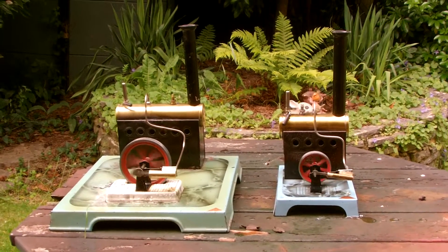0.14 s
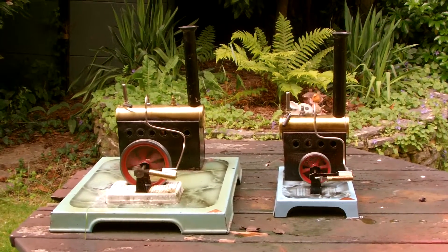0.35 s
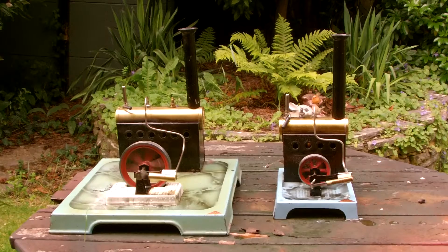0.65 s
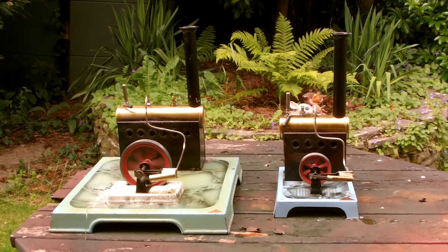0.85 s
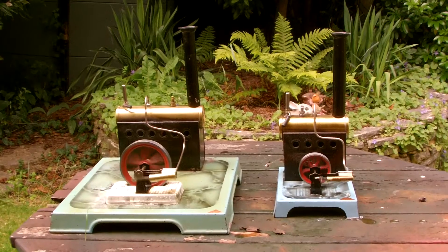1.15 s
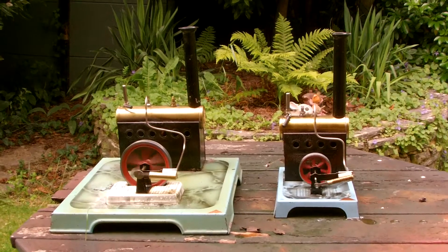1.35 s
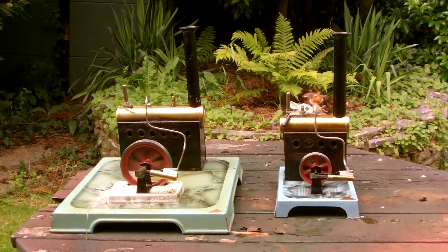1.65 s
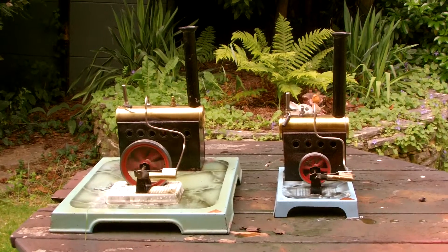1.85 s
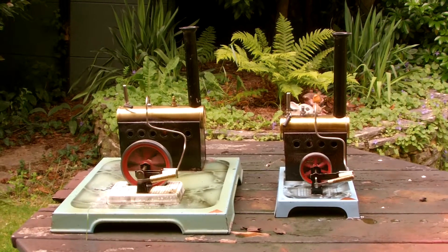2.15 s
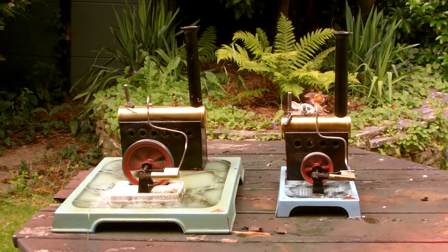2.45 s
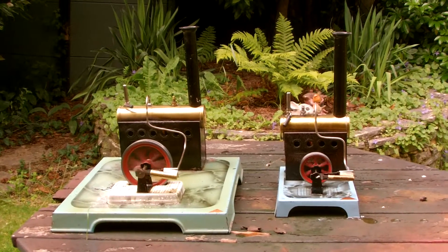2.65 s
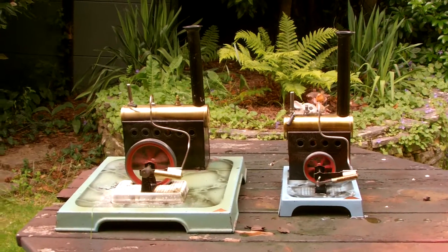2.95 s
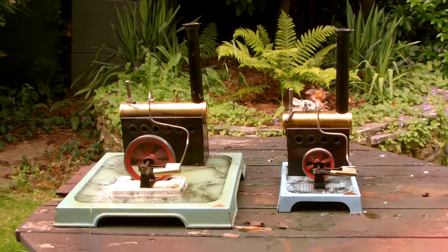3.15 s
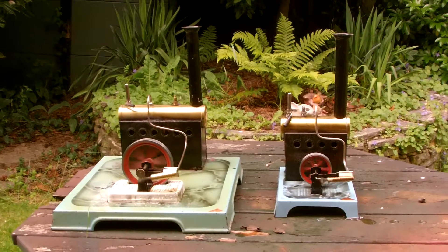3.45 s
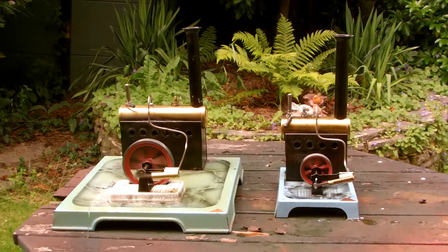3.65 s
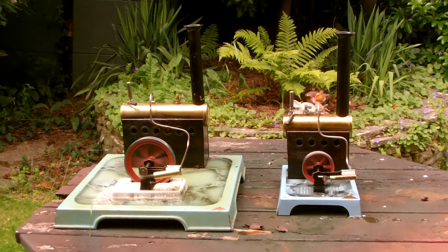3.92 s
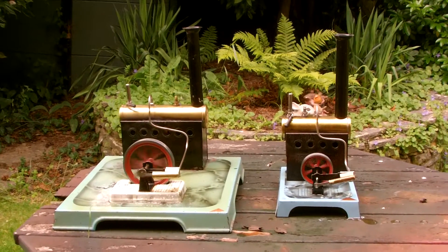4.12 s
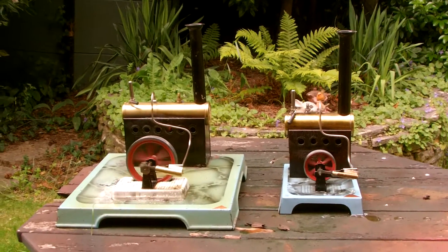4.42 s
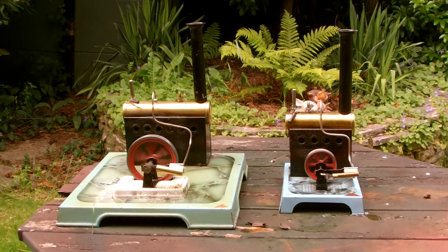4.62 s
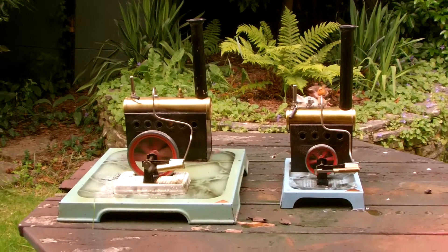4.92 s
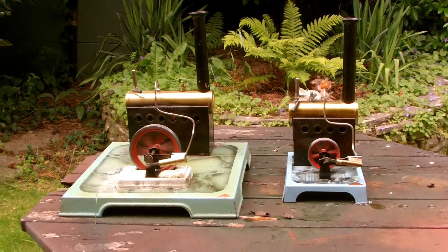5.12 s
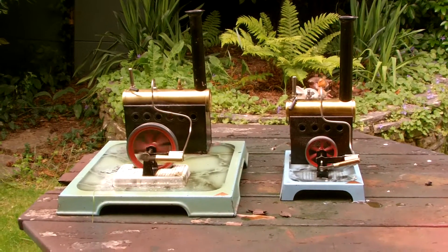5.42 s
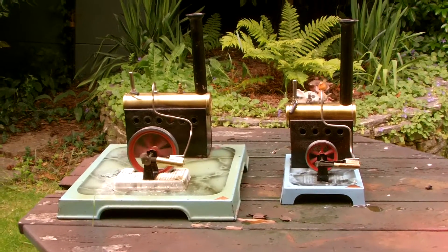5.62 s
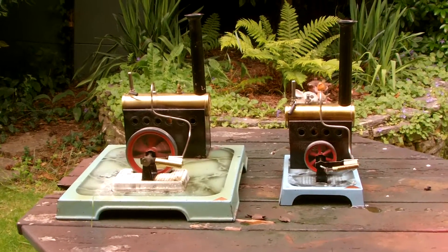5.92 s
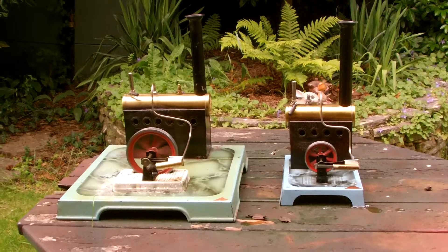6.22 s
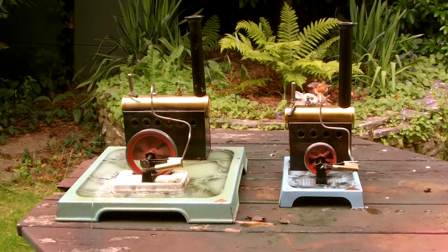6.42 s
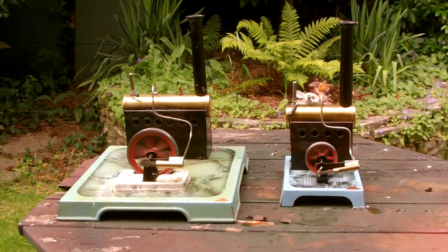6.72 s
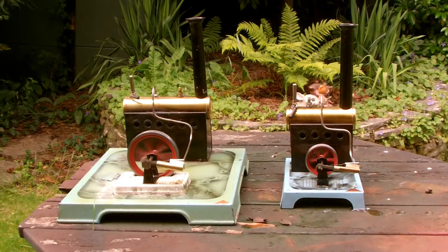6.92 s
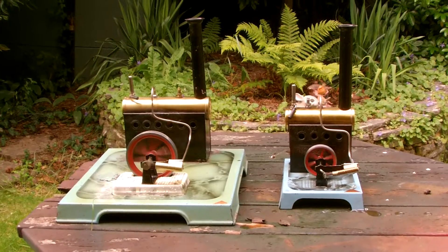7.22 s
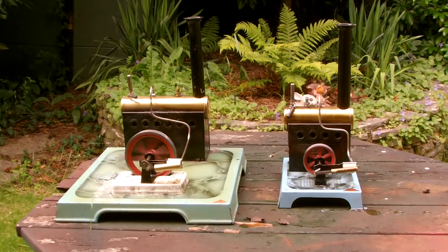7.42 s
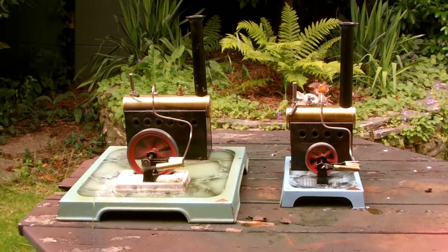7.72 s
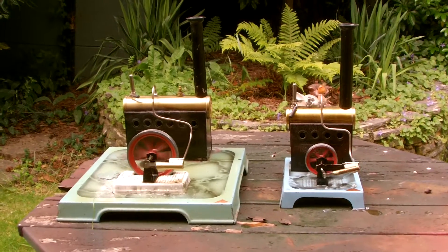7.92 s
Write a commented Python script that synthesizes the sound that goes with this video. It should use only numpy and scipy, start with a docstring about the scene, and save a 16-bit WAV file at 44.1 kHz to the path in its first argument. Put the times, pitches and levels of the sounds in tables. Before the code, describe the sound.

A toy steam engine runs with a fast, steady metallic clatter and wet steam puffs over a soft boiler hiss.

```python
"""Toy steam engine on a garden table.

About 19 turns a second. On each turn the loose crank taps, ticks and knocks into the tin base,
then the cylinder puffs wet steam. In spells it limps, strong and weak turns alternating.
Behind it: steady boiler hiss with leaks and spits, open-air rumble, a distant car and a bird."""
import sys
import numpy as np
from scipy import signal
from scipy.fft import rfft, irfft
from scipy.io import wavfile
from scipy.ndimage import uniform_filter1d

SR = 44100
rng = np.random.default_rng(int(sys.argv[2]) if len(sys.argv) > 2 else 0)


def int16_out(signal):
    """Quantize to a 16-bit WAV file."""
    q = np.round(np.clip(np.atleast_2d(signal).T, -1, 1) * 32767)
    wavfile.write(sys.argv[1], SR, q.astype(np.int16))


N = 355439
TIME_S = np.arange(N) / SR
FREQS_HZ = np.maximum(np.fft.rfftfreq(N, 1 / SR), 1)

# noise spectra: (frequency [Hz], relative density [dB])
AIR_SPECTRUM = [(20, 9), (60, -2.5), (110, -4), (170, -1.5), (350, -1.5), (700, -18), (2000, -32)]
CAR_SPECTRUM = [(50, -10), (130, -4.5), (225, -3), (262, 6.5), (290, -6), (500, 0.5), (1000, -21.5)]
BOILER_SPECTRUM = [(150, -26), (300, -10.5), (450, -2.5), (620, 1.5), (800, 11.5), (895, 5.5), (990, 10.5),
                   (1400, 1.5), (2800, -9.5), (5500, -6), (7300, -8), (10000, -8), (12500, -11),
                   (16000, -17)]
STEAM_SPECTRUM = [(300, -23), (1200, -9), (3000, -10), (5200, -5), (6400, -4), (7300, -7.5), (8700, 4),
                  (9800, 6.5), (11300, 6), (12200, -9.5), (14500, -0.5), (16000, -17)]
CRACK_SPECTRUM = [(400, -17), (1500, -50), (3000, 0), (6200, 5.5), (7300, -1.5), (8700, 9.5), (11200, 5.5),
                  (12300, 3), (16000, -14)]
RATTLE_SPECTRUM = [(200, -47), (420, -3), (700, 0), (900, 8), (1200, 13), (1700, 3.5), (1950, 2),
                   (2400, -1), (2850, 3), (4000, -4), (6200, -2), (7300, -39), (16000, 4.5)]
# left-right likeness of the noises: (frequency [Hz], coherence [0-1])
COHERENCE = [(30, .1), (80, .35), (170, .76), (350, .93), (780, .997), (1000, .99), (1300, .997),
             (2200, .95), (3200, .993), (5500, .91), (7500, .76), (10000, .81), (14000, .6)]
# engine balance: (frequency [Hz], left minus right [dB])
BALANCE = [(2500, -.12), (5500, -1.1), (10000, -2.5), (14000, -3.4)]
# bird notes: (start [s], length [s], first pitch [Hz], last pitch [Hz], level [dB], trill depth [Hz])
BIRD_NOTES = [(5.357, 0.054, 2110, 2025, -52, 20), (5.646, 0.16, 2136, 2215, -52, 130),
              (5.781, 0.054, 2280, 1920, -47, 83), (5.91, 0.05, 3110, 3070, -55.5, 20),
              (6.02, 0.07, 2960, 2930, -59, 60), (6.106, 0.057, 2700, 2390, -46.5, 20),
              (6.172, 0.12, 2404, 2140, -49.5, 15), (6.74, 0.088, 2210, 2124, -50, 15),
              (6.833, 0.1, 2190, 2237, -46, 4.5)]
# gusts of leaking steam: (centre [s], length [s], level [dB])
STEAM_LEAKS = [(1.227, 0.18, -49), (1.387, 0.028, -56), (5.42, 0.055, -51)]
# spitting drops of hot water: (time [s], level [dB])
WATER_SPITS = [(1.955, -23), (2.012, -26), (2.224, -24), (2.969, -26), (3.312, -28), (5.450, -26),
               (5.606, -23.5), (6.545, -35), (6.732, -22), (7.272, -23), (7.479, -30)]
# puffs carrying a slug of water: (time [s], boost [dB])
WATER_SLUGS = [(1.38, 5.5), (2.22, 2.5), (2.58, 7), (4.72, 3.5), (4.93, 4), (5.34, 10), (5.45, 1),
               (6.85, 6.5), (7.12, 5.5), (7.27, 1), (7.48, 3.5), (7.74, 3.5), (8.05, 2)]
# flywheel: (time [s], speed [turns/s])
FLYWHEEL_SPEED = [(0.0, 19.12), (1.0, 19.14), (2.0, 19.13), (3.0, 19.19), (4.0, 19.2), (5.0, 19.2),
                  (6.0, 19.21), (7.0, 19.17), (8.0, 19.16)]
# limping: (start [s], end [s], load added on even turns and taken off odd ones [dB], crack boost [dB])
LIMP_SPELLS = [(-0.1, 0.49, -1.5, -1), (0.476, 1.077, 1.2, 2.5), (1.1, 1.67, -1.2, 0.5),
               (1.99, 2.334, -0.9, 2), (2.524, 2.93, 1.3, -0.5), (3.3, 3.788, 2.0, 2),
               (3.973, 4.197, -1.5, -2), (4.186, 4.913, -2, 2.5), (5.186, 5.516, 1.15, 2),
               (5.66, 6.317, -1.5, -2.5), (6.7, 7.315, -0.7, -1.5), (7.33, 7.557, 1, -2),
               (7.56, 8.195, 1.83, 3)]
# single hard knocks: (time [s], load boost [dB], crack boost [dB])
KNOCK_ACCENTS = [(0.157, -1, 9), (0.47, 1, -2.5), (0.68, 2.5, -4), (0.94, 1.5, -10), (1.36, 3.5, 0),
                 (1.62, 0, 2), (1.83, 1.5, 1), (5.17, 2, -4), (5.32, 0.05, 3.5), (5.43, -0.5, 2.5),
                 (5.58, 1.5, 1.5), (6.0, 0, 7), (6.73, 1.5, 0), (7.15, 1.5, -3), (7.25, 0.5, 7),
                 (7.72, 1.6, -7), (8.03, -0.5, 7)]
# contacts of one turn: (offset from main knock [s], force [dB], click gain [dB],
# low edge [Hz], high edge [Hz], load sensitivity [dB/dB])
CRANK_CONTACTS = [(-.0104, -6, -9, 913, 2420, 0.27), (-.0063, -32.5, 18, 990, 2490, .3),
                  (-.0024, -5, -14.5, 1050, 8300, 0.091), (-.0008, -1.44, -28.5, 328, 8400, 1.5)]
# modes of tin base and boiler: (frequency [Hz], gain [dB], t60 [s])
TIN_MODES = [(440.5, -36, 0.049), (538, -44.5, 0.077), (666.5, -36, 0.063), (744.6, -23.5, 0.038),
             (802.3, -20, 0.054), (1000.5, -22, 0.038), (1096, -40, 0.041), (1219, -39, 0.037),
             (1470, -67.5, 0.013), (1515, -37.5, 0.047), (1698, -31.5, 0.018), (2105, -39.5, 0.036),
             (2376, -41.5, 0.046), (2511, -46, 0.06), (3127, -40, 0.03), (3518, -44, 0.08),
             (3737, -50.5, 0.065), (3955, -47.5, 0.061), (4227, -44.5, 0.041), (4725, -55.5, 0.12),
             (4983, -48.5, 0.07), (5440, -50, 0.09), (6277, -43.5, 0.034), (6500, -77, 0.12),
             (7030, -55.5, 0.091), (8270, -47, 0.019), (9760, -40, 0.029)]


def from_db(db):
    """Decibels to gain."""
    return 10 ** (np.asarray(db) / 20)


def over_hz(table):
    """Table interpolated over log frequency."""
    hz, values = np.transpose(table)
    return np.interp(np.log(FREQS_HZ), np.log(hz), values)


def noise(spectrum):
    """Coloured stereo noise, rms 1."""
    mid, side = rfft(rng.standard_normal((2, N)))
    coherence = np.clip(over_hz(COHERENCE), 0, 1)
    stereo = np.sqrt(1 + coherence) * mid + np.sqrt(1 - coherence) * side * [[1], [-1]]
    coloured = irfft(stereo * from_db(over_hz(spectrum)), N)
    return coloured / coloured.std()


def impulses(times_s, gains):
    """One impulse at each time."""
    index = np.round(times_s * SR).astype(int)
    inside = (index >= 0) & (index < N)
    return np.bincount(index[inside], gains[inside], N)


def swell(rise_s, t60_s):
    """Envelope: exponential rise and decay."""
    t = TIME_S[:SR // 5]
    return (1 - np.exp(-t / rise_s)) * np.exp(-np.log(1000) * t / t60_s)


def gate(t, start_s, end_s, fade_s):
    """Trapezoid window."""
    return np.clip(.5 + np.minimum(t - start_s, end_s - t) / fade_s, 0, 1)


def convolve(x, response):
    """Convolution cut to N samples."""
    return signal.oaconvolve(x, response)[:N]


def bandpass(x, low_hz, high_hz):
    """Butterworth band-pass."""
    return signal.sosfilt(signal.butter(2, [low_hz, high_hz], "band", fs=SR, output="sos"), x)


def accents(table, strokes_s):
    """Boosts per stroke, one array per dB column; each row goes to its nearest stroke."""
    times_s, *columns = np.transpose(table)
    nearest = np.abs(strokes_s - times_s[:, None]).argmin(axis=1)
    return [np.bincount(nearest, db, len(strokes_s)) for db in columns]


def outdoors(air_db, car_db, closest_s, half_width_s):
    """Open-air rumble; a far car swells and fades as it passes."""
    car_gain = from_db(car_db) / (1 + ((TIME_S - closest_s) / half_width_s) ** 2)
    return from_db(air_db) * noise(AIR_SPECTRUM) + car_gain * noise(CAR_SPECTRUM)


def bird(trill_hz, waver_hz, echo_db, echo_t60_s):
    """Fluted, gliding, wavering notes, some trilled, scattered by walls and trees."""
    song = np.zeros(N)
    waver = uniform_filter1d(rng.standard_normal(N), size=200)
    waver /= waver.std()
    trill = np.sin(2 * np.pi * trill_hz * TIME_S)
    for start_s, length_s, first_hz, last_hz, db, depth_hz in BIRD_NOTES:
        end_s = start_s + length_s
        glide_hz = np.interp(TIME_S, [start_s, end_s], [first_hz, last_hz])
        pitch_hz = glide_hz + depth_hz * trill + waver_hz * waver
        tone = np.sin(2 * np.pi * np.cumsum(pitch_hz) / SR)
        song += from_db(db) * gate(TIME_S, start_s, end_s, fade_s=0.016) * tone
    echoes = swell(0.012, echo_t60_s) * rng.standard_normal(SR // 5)
    return song + from_db(echo_db) * convolve(song, echoes / np.linalg.norm(echoes))


def boiler(hiss_db, spit_t60_s):
    """Burner and boiler hiss steadily; at times steam leaks or a drop spits."""
    leaks = sum(from_db(db) * np.exp(-2 * ((TIME_S - centre_s) / length_s) ** 2)
                for centre_s, length_s, db in STEAM_LEAKS)
    spit_s, spit_db = np.transpose(WATER_SPITS)
    spits = convolve(impulses(spit_s, from_db(spit_db)), swell(.0001, spit_t60_s))
    hiss = from_db(hiss_db) * noise(BOILER_SPECTRUM)
    return hiss + leaks * noise(CRACK_SPECTRUM) + spits * noise(STEAM_SPECTRUM)


def exhaust(knock_s, level_db, growth_db_per_s, delay_s, rise_s, t60_s, scatter_db, drops_per_s, drop_db):
    """The port opens once a turn; droplets make each puff sputter."""
    puff_s = np.append(2 * knock_s[0] - knock_s[1], knock_s) + delay_s  # starts one turn early
    late, harder = rng.standard_normal((len(puff_s), 2)).T
    slug_db, = accents(WATER_SLUGS, puff_s)
    puff_db = level_db + growth_db_per_s * puff_s + slug_db + scatter_db * harder
    puffs = impulses(puff_s + 0.00023 * late, from_db(puff_db))
    drops = (rng.random(N) < drops_per_s / SR) * rng.uniform(0, 1, N)
    sputter = 1 + from_db(drop_db) * convolve(drops, swell(.00005, 0.0019))
    return noise(STEAM_SPECTRUM) * convolve(puffs, swell(rise_s, t60_s)) * sputter


def crank_turns(base_load_db, scatter_db):
    """Knock time, load and crack boost per turn; limping alternates strong and weak turns."""
    turns = np.cumsum(np.interp(TIME_S, *np.transpose(FLYWHEEL_SPEED))) / SR
    turn_number = np.arange(1, int(turns[-1]) + 1)
    knock_s = np.interp(turn_number, turns, TIME_S)
    load_db, crack_db = accents(KNOCK_ACCENTS, knock_s)
    for start_s, end_s, limp_db, boost_db in LIMP_SPELLS:
        spell = gate(knock_s, start_s, end_s, fade_s=0.026)
        load_db += spell * limp_db * (-1) ** turn_number
        crack_db += spell * boost_db
    load_db += rng.normal(base_load_db, scatter_db, len(knock_s))
    return knock_s, load_db, crack_db


def metal_cracks(knock_s, load_db, crack_db, level_db, db_per_load_db, delay_s, t60_s,
                 tail_db, tail_t60_s, ring_db):
    """Metal meets metal: the treble grows much faster than the load."""
    blow_db = level_db + crack_db + db_per_load_db * load_db + rng.normal(0, 1.0, len(knock_s))
    blows = impulses(knock_s + delay_s, from_db(blow_db))
    envelope = swell(.001, t60_s) + from_db(tail_db) * swell(.003, tail_t60_s)
    grit = noise(CRACK_SPECTRUM)
    # dense high modes of small parts ring alike on every blow
    ring = np.array([convolve(blows, envelope * channel[:len(envelope)]) for channel in grit])
    return grit * convolve(blows, envelope) + from_db(ring_db) * ring


def crank_clatter(knock_s, load_db, rise_cycles, rattle_db, rattle_t60_s, scrape_db, scrape_t60_s,
                  jitter_s, scatter_db, spot_db):
    """Crank play closes in a run of contacts; each clicks, scrapes, rings the tin, rattles loose parts."""
    t = TIME_S[:SR // 5]
    modes = [from_db(db) * swell(rise_cycles / hz, t60_s) * np.sin(2 * np.pi * hz * t)
             for hz, db, t60_s in TIN_MODES]
    rattle_noise = noise(RATTLE_SPECTRUM)
    scrape = from_db(scrape_db) * swell(.0001, scrape_t60_s)
    shake = scrape + from_db(rattle_db) * swell(0.0048, rattle_t60_s)
    clatter = 0
    for k, (offset_s, force_db, click_db, low_hz, high_hz, sensitivity) in enumerate(CRANK_CONTACTS):
        late, harder, spot = rng.standard_normal((len(knock_s), 3)).T
        contact_s = knock_s + offset_s + jitter_s * late
        force = from_db(force_db + sensitivity * load_db - scatter_db * harder)
        blows = impulses(contact_s, force)
        # neighbouring modes swing in antiphase; the spot struck favours one set
        favour = from_db(spot_db * spot)
        even = convolve(impulses(contact_s, force * favour), sum(modes[::2]))
        odd = convolve(impulses(contact_s, force / favour), sum(modes[1::2]))
        rattle = np.roll(rattle_noise, k * SR, axis=1) * convolve(blows, shake)
        clatter += bandpass(from_db(click_db) * blows + even - odd + rattle, low_hz, high_hz)
    return clatter


def scene():
    """Engine, its treble slightly to the right, over the garden background."""
    knock_s, load_db, crack_db = crank_turns(base_load_db=-0.61, scatter_db=0.26)
    engine = crank_clatter(knock_s, load_db, rise_cycles=6.03, rattle_db=-33, rattle_t60_s=0.07,
                           scrape_db=-28.5, scrape_t60_s=0.0034,
                           jitter_s=.00022, scatter_db=0.1, spot_db=1.2)
    engine += metal_cracks(knock_s, load_db, crack_db, level_db=-40, db_per_load_db=3.75,
                           delay_s=.0009, t60_s=0.018, tail_db=-4, tail_t60_s=0.095, ring_db=-0.5)
    engine += exhaust(knock_s, level_db=-32, growth_db_per_s=0.13, delay_s=0.021, rise_s=0.0034,
                      t60_s=.044, scatter_db=1.5, drops_per_s=300, drop_db=10.5)
    engine += boiler(hiss_db=-48, spit_t60_s=0.0042)
    pan = from_db(over_hz(BALANCE) * [[.5], [-.5]])
    engine = irfft(rfft(engine) * pan, N)
    song = bird(trill_hz=65.7, waver_hz=15.9, echo_db=-3.5, echo_t60_s=0.11)
    return engine + song + outdoors(air_db=-66.5, car_db=-59.5, closest_s=5.1, half_width_s=0.57)


def record(dry):
    """Steep elliptic low-pass."""
    cutoff_hz = 16100
    return signal.sosfilt(signal.ellip(12, .1, 80, cutoff_hz, fs=SR, output="sos"), dry)


dry = scene()
out = record(dry)
int16_out(out)
```